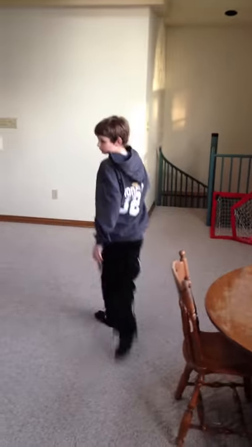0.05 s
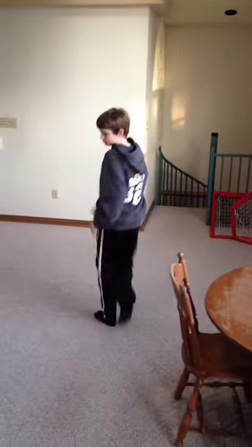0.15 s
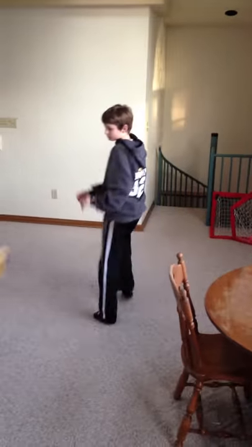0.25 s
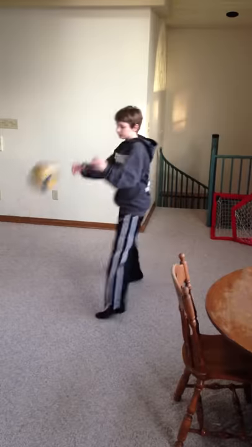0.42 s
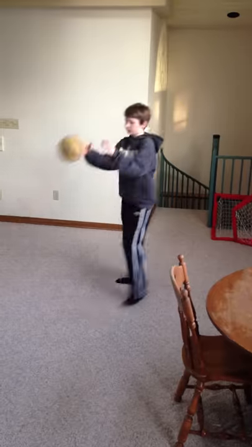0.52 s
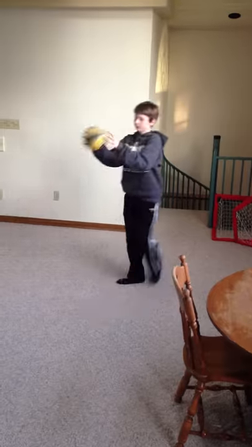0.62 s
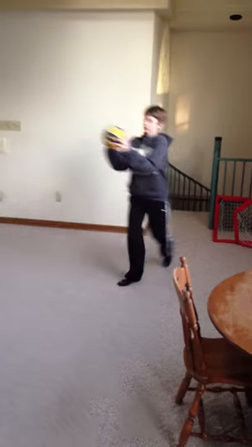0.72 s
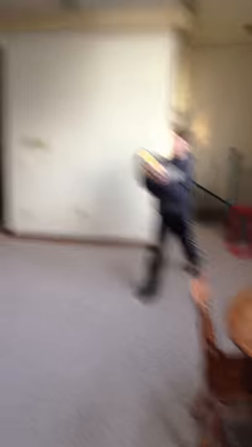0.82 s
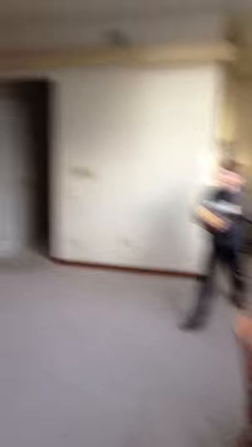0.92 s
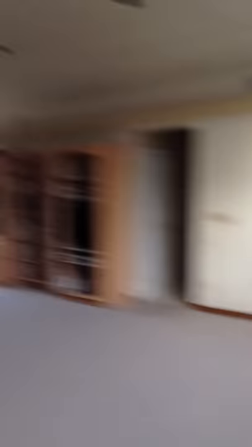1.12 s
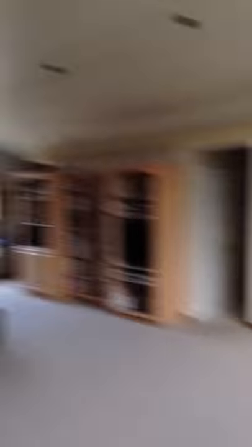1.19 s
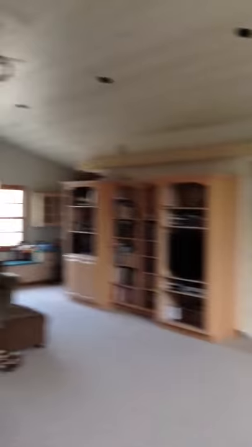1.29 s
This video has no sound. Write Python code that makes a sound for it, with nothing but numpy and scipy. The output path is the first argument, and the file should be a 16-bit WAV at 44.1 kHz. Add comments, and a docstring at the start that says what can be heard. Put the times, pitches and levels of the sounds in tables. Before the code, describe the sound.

One hollow thud of an inflated ball hitting an indoor wall, with a brief boom.

```python
"""A ball thrown at a wall

A boy throws a small inflated ball at a plasterboard wall in a large carpeted room, a few metres from
a phone. The skin slaps, the air in the ball pings, the panel thuds, and the room answers with echoes
and a boom. He catches the rebound softly; clothes rustle and hands knock faintly over a quiet hiss."""
import sys
import numpy as np
from scipy import signal
from scipy.fft import rfft, irfft
from scipy.io import wavfile
from scipy.ndimage import uniform_filter1d

SR = 44100
rng = np.random.default_rng(int(sys.argv[2]) if len(sys.argv) > 2 else 0)


def digitize_waveform(pressure):
    """Quantize a signal to 16-bit integers and store it at the path in sys.argv[1].

    Rows of a 2-D input are taken as channels; values are limited to [-1, 1].
    """
    field = np.atleast_2d(pressure).T
    bounded = np.clip(field, -1, 1)
    quanta = np.round(bounded * 32767).astype(np.int16)
    wavfile.write(sys.argv[1], SR, quanta)


N = 59535
IMPACT_S = 0.2072


def undb(db):
    """Amplitude grows tenfold for every 20 dB."""
    return 10 ** (np.asarray(db) / 20)


def since(start):
    """Causal time: seconds since an onset, zero before it."""
    return np.maximum(np.arange(N) / SR - start, 0)


def along(points, hz):
    """Interpolation of (Hz, value) rows on a logarithmic frequency axis."""
    p = np.array(points, float)
    return np.interp(np.log(hz), np.log(p[:, 0]), p[:, 1])


def bins():
    """Fourier frequencies in Hz, floored at 1."""
    return np.maximum(np.arange(N // 2 + 1) * SR / N, 1)


def noise(gain):
    """Random phases turn a magnitude spectrum into noise of unit rms."""
    x = irfft(gain * np.exp(2j * np.pi * rng.random(N // 2 + 1)), N)
    return x / np.std(x)


def coloured(points):
    """Spectral shaping of noise by (Hz, relative dB) rows."""
    return noise(undb(along(points, bins())))


def noise_band(hz, octaves):
    """A broad resonance gathers noise around one frequency."""
    return noise(1 / (1 + (np.log2(bins() / hz) / octaves) ** 2 / 2) ** 2)


def waver(rate_hz):
    """A moving average smooths random steps into a drift with a spread near 1."""
    width = int(SR / rate_hz)
    steps = np.repeat(rng.standard_normal(N)[:N // width + 1], width)
    return np.sqrt(2) * uniform_filter1d(steps, width)[:N]


def strike(t, rise, t60):
    """Damping: after a smooth onset, amplitude falls 60 dB every t60 seconds."""
    return (1 - np.exp(-(t / rise) ** 2)) * np.exp(-np.log(1000) * t / t60)


def ring(start, hz, db, t60, rise):
    """A struck mode vibrates as a damped sinusoid."""
    t = since(start)
    return undb(db) * strike(t, rise, t60) * np.sin(2 * np.pi * hz * t)


def hiss():
    """The noise floor: room tone and microphone hiss, wavering slightly in level."""
    # Each row: frequency in Hz, relative spectral level in dB.
    spectrum = [(25, -38), (70, -18), (110, -12.5), (170, 2), (280, -0.5), (500, -1), (900, -6.5),
                (2000, -7.5), (4500, -11), (7000, -15), (11000, -17), (15000, -17.5)]
    return undb(-62.5 - 0.47 * waver(rate_hz=9.12)) * coloured(spectrum)


def clothes():
    """Sliding friction of cloth on cloth makes short, grainy swells of noise."""
    # Each row: peak time, rise and fall in seconds, level in dB, centre in Hz, width in octaves.
    swishes = [(0.019, 0.025, 0.033, -65.5, 2250, 0.67), (.135, 0.028, 0.033, -67.5, 4350, 0.12),
               (.45, 0.087, 0.064, -69, 3400, 1.1), (.58, .02, .025, -69, 5170, 0.32),
               (.628, 0.01, 0.0073, -62.5, 2280, 0.85), (.76, .02, 0.03, -60, 2030, 0.95),
               (.815, 0.02, 0.037, -62, 2200, 0.7), (.83, 0.043, 0.042, -63, 515, 0.22),
               (1.04, 0.046, 0.039, -69.5, 4980, 0.093), (1.09, 0.13, 0.047, -72, 2430, 0.11),
               (1.113, 0.016, 0.022, -64, 700, 0.83), (1.115, 0.056, 0.042, -63, 2500, 1.06),
               (1.25, 0.039, 0.017, -63.5, 2190, 1.6), (1.335, 0.017, 0.023, -67.5, 406, 0.43)]
    out = 0
    for peak, rise, fall, db, hz, octaves in swishes:
        t = np.arange(N) / SR - peak
        swell = np.exp(-(t / np.where(t < 0, rise, fall)) ** 2 / 2)
        out += undb(db) * noise_band(hz, octaves) * swell
    grain_db = 1.15 * waver(rate_hz=250)
    return out * undb(grain_db)


def pats():
    """Soft impacts of hands, ball and feet: each a damped knock, a tick and faint reverberation."""
    # Each row: start in seconds, knock level in dB, its centre in Hz, tick and room levels in dB.
    contacts = [(.002, -48, 474, -53.5, -62), (.194, -49, 333, -58.5, -57), (0.7237, -42, 440, -60, -53),
                (1.2146, -49.5, 372, -49, -70.5)]
    # Each row of both: frequency in Hz, relative spectral level in dB.
    tick_colour = [(100, -20), (700, 0.5), (1100, -6), (1400, 2), (1650, 1), (2000, 4), (2400, -15),
                   (2850, -3), (3400, -9), (4600, -6), (7000, -17), (14000, -35)]
    room_colour = [(40, -44), (110, -1), (200, 3), (500, -1), (900, -10), (2000, -12), (5000, -27),
                   (14000, -38)]
    out = 0
    for start, knock_db, hz, tick_db, room_db in contacts:
        t = since(start)
        out += undb(knock_db) * noise_band(hz, octaves=0.52) * strike(t, rise=0.0042, t60=0.1)
        out += undb(tick_db) * coloured(tick_colour) * strike(t, rise=0.001, t60=0.054)
        out += undb(room_db) * reverberation(start, room_colour, rise=0.0087, hold=0.029)
    return out


def reverberation(start, colour, rise, hold):
    """A diffuse field builds and holds, then absorption drains each octave at its own rate."""
    # Each row: frequency in Hz, reverberation time in seconds.
    decay_times = [(60, .3), (150, 0.65), (300, .6), (600, 0.48), (1200, 0.51), (2400, 0.27), (5000, 0.33),
                   (12000, 0.23)]
    t = since(start)
    spectrum = rfft(coloured(colour))
    lowest_hz = 60
    octave = np.clip(np.log2(bins() / lowest_hz), 0, 8)
    out = 0
    for k in range(9):
        band = irfft(spectrum * np.maximum(1 - abs(octave - k), 0), N)
        t60 = along(decay_times, lowest_hz * 2 ** k)
        out += band * np.exp(-np.log(1000) * np.maximum(t - hold, 0) / t60)
    return out * (1 - np.exp(-t / rise))


def ball_slap():
    """Impact radiation: the flattening ball pushes out a pressure pulse as its skin slaps."""
    # Each row: frequency in Hz, relative spectral level in dB.
    skin_colour = [(40, -32), (200, -7), (600, 1), (1200, -1.5), (2200, -13), (4000, -20), (6500, -31),
                   (12000, -48)]
    peak_s, width_s, low_cut_hz = IMPACT_S + 0.00096, 0.00026, 218
    pulse = undb(-16) * np.exp(-((np.arange(N) / SR - peak_s) / width_s) ** 2)
    pulse = signal.sosfilt(signal.butter(2, low_cut_hz, "high", fs=SR, output="sos"), pulse)
    slap = undb(-22.5) * coloured(skin_colour) * strike(since(IMPACT_S), rise=0.00057, t60=0.019)
    return pulse + slap


def ball_ping():
    """The skin and the enclosed air ring at their natural frequencies."""
    # Each row: frequency in Hz, relative level in dB, t60 in seconds.
    modes = [(997, -31.5, 0.11), (1163, -40.5, 0.09), (1254, -38, 0.084), (1428, -36.5, 0.093),
             (1705, -33, 0.091), (1860, -41, 0.15), (2820, -41, 0.032), (3660, -44, 0.061),
             (3780, -54.5, 0.09), (4235, -49.5, 0.055), (4750, -56, 0.084), (6210, -63.5, .08)]
    return sum(ring(IMPACT_S, *mode, rise=0.00023) for mode in modes)


def wall_thud():
    """The panel gives way just after the skin lands and rings in its bending modes."""
    # Each row: frequency in Hz, relative level in dB, t60 and rise in seconds.
    modes = [(320, -6, .048, .0035), (529, -20, .13, .0025), (586, -29, .38, .001), (754, -25, .15, .001),
             (845, -32, .2, .002)]
    return sum(ring(IMPACT_S + 0.0015, *mode) for mode in modes)


def room_boom():
    """Standing waves of the room, each set off when its reflection arrives."""
    # Each row: delay in seconds, frequency in Hz, relative level in dB, t60 and rise in seconds.
    modes = [(.003, 153, -23, .43, .002), (.01, 145, -19, .23, .014), (.011, 235, -30, .33, .015),
             (.01, 335, -31, .36, .01), (.022, 271, -29, .35, .022), (.022, 446, -27, .24, .029),
             (.052, 182, -15, .135, .002), (.053, 161, -21, .27, .013), (.051, 206, -21, .25, .03),
             (.053, 74, -30, .11, .004)]
    return sum(ring(IMPACT_S + delay, *mode) for delay, *mode in modes)


def echoes(direct):
    """Early reflections: floor, side wall and far wall each return a delayed, weaker copy."""
    # Each row: delay in seconds, level in dB relative to the direct sound.
    paths = [(.0043, -8.5), (.0072, -7.5), (.052, -18)]
    t = np.arange(N) / SR
    return sum(undb(db) * np.interp(t - delay, t, direct) for delay, db in paths)


def bounce():
    """One impact excites ball, wall and room, and their responses add."""
    # Each row: frequency in Hz, relative spectral level in dB.
    tail_colour = [(30, -38), (50, -21), (100, -14), (135, -1), (190, -2.5), (250, 0), (295, -1.5),
                   (360, 0.5), (405, -11), (470, -4.5), (545, -1.5), (650, -2.5), (705, -10), (770, -8),
                   (900, -9.5), (1150, -12), (1400, -19), (1880, -19.5), (2200, -25.5), (3000, -33.5),
                   (5000, -43.5), (8000, -54), (14000, -65)]
    slap = ball_slap()
    tail = undb(-29) * reverberation(IMPACT_S, tail_colour, rise=0.002, hold=0.054)
    return undb(-0.5) * (slap + ball_ping() + wall_thud() + room_boom() + echoes(slap) + tail)


def scene():
    """Superposition of all sources at one microphone."""
    return (hiss() + clothes() + pats() + bounce())[None, :]


def record(dry):
    """Band limiting: the phone's steep low-pass filter cuts the highest treble."""
    cutoff_hz = 15300
    return signal.sosfilt(signal.ellip(12, .1, 70, cutoff_hz, fs=SR, output="sos"), dry)


dry = scene()
out = record(dry)
digitize_waveform(out)
```